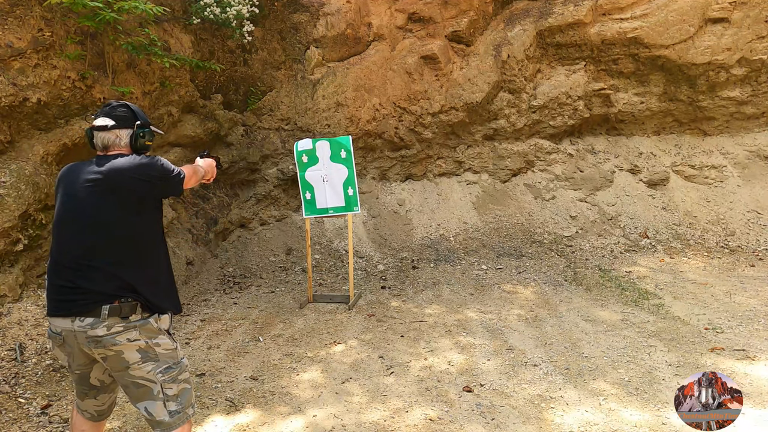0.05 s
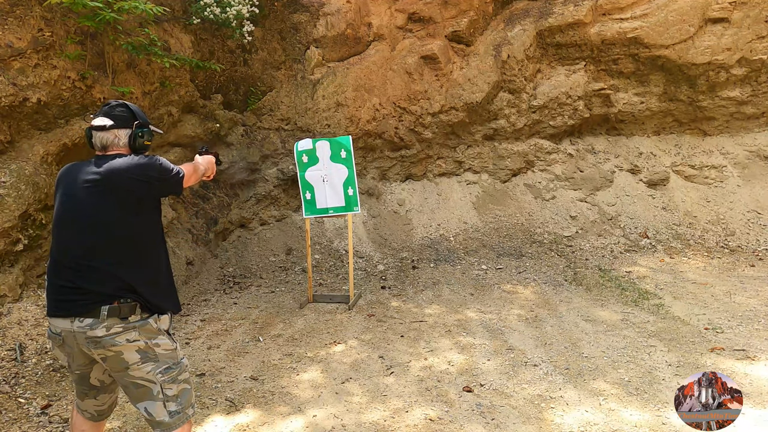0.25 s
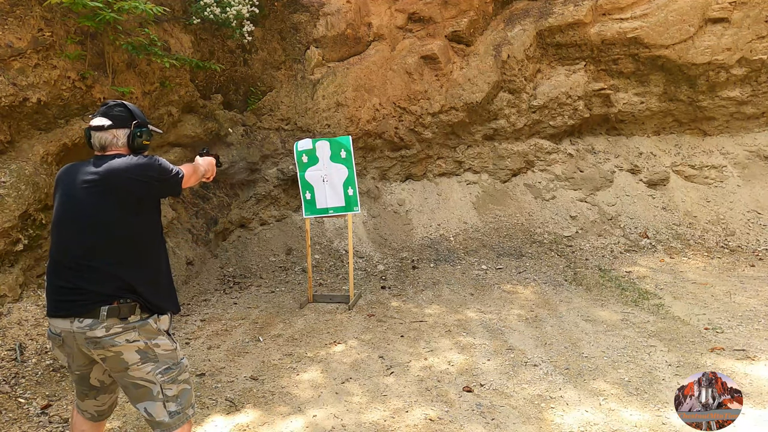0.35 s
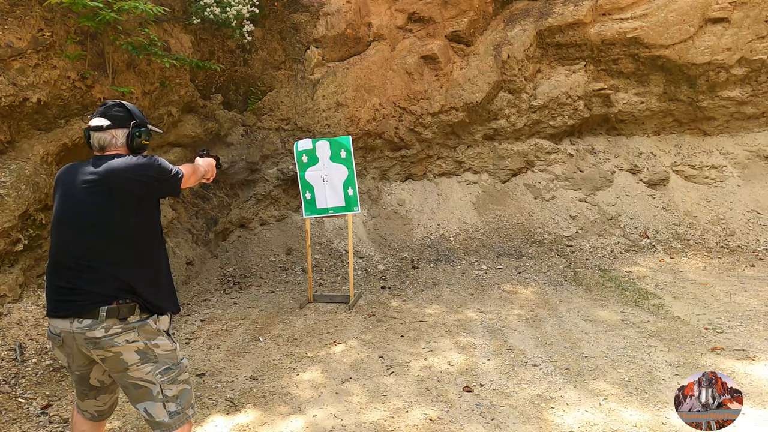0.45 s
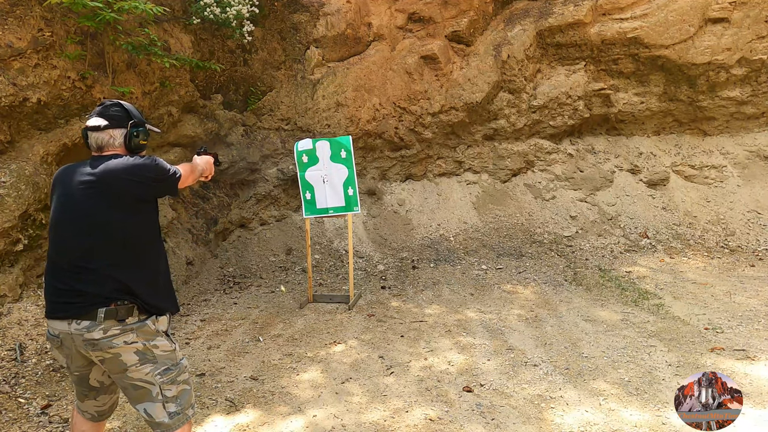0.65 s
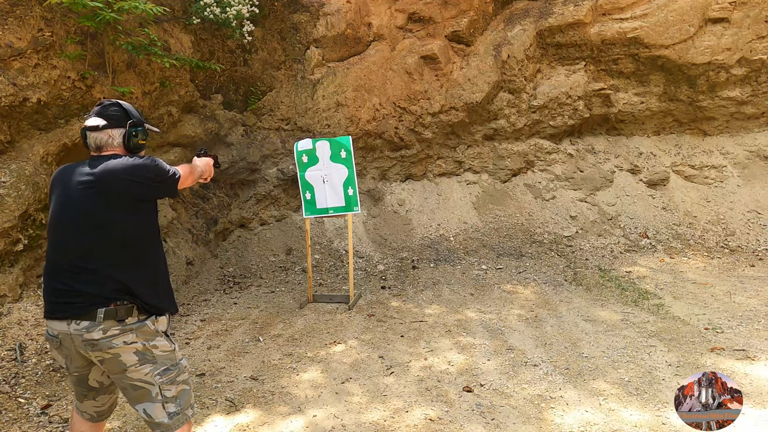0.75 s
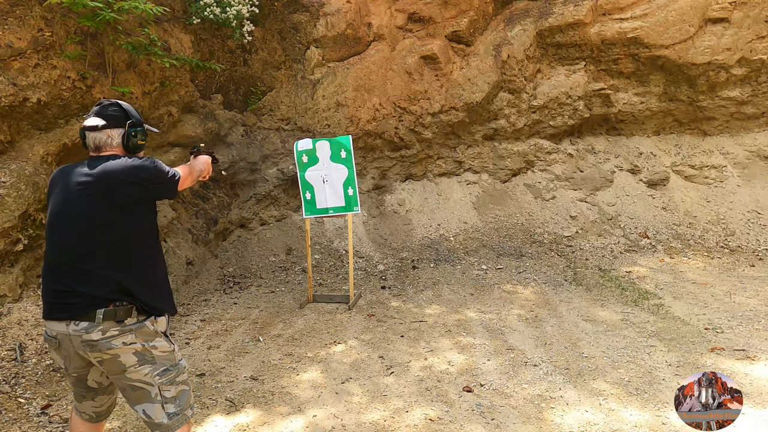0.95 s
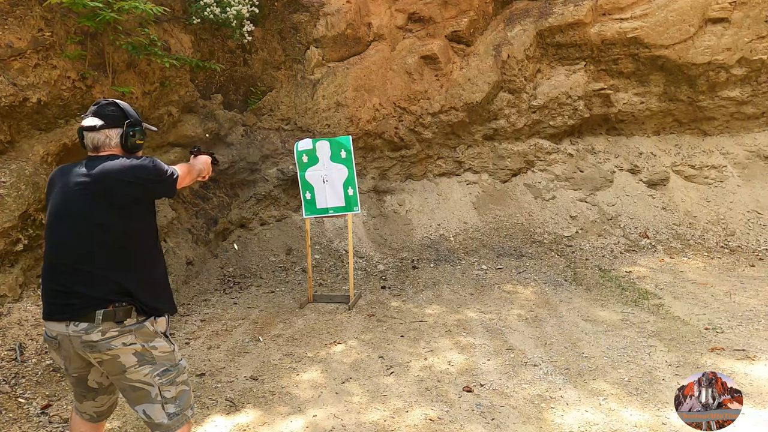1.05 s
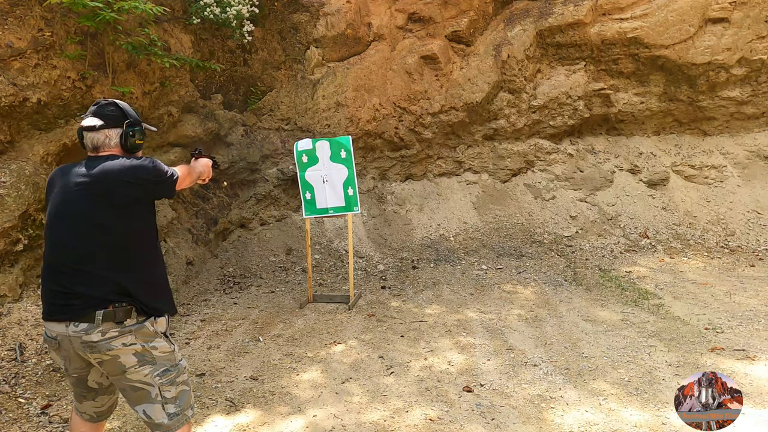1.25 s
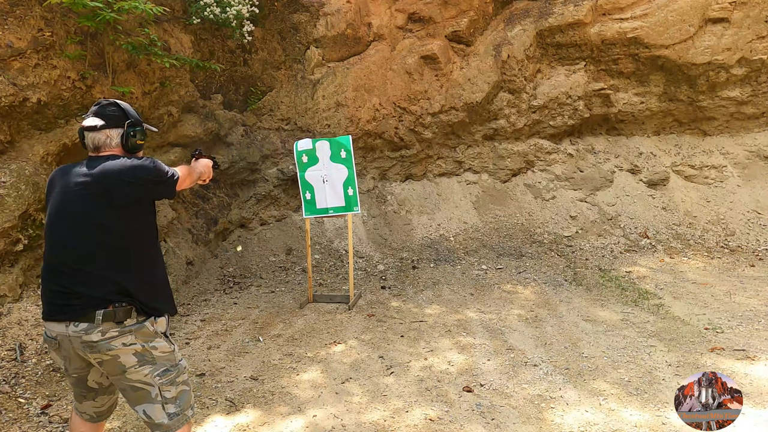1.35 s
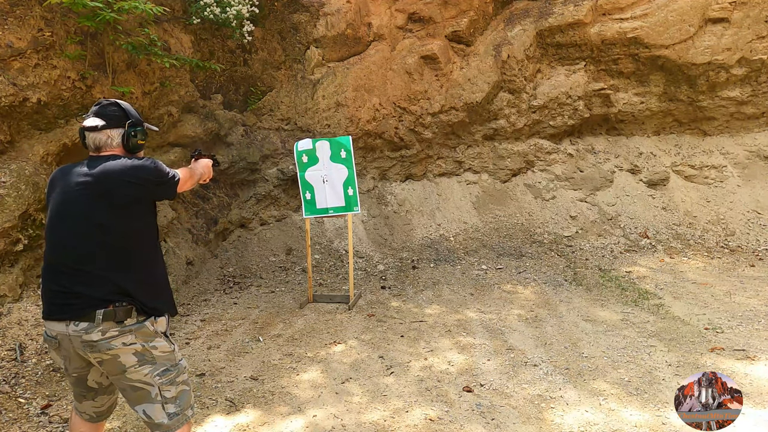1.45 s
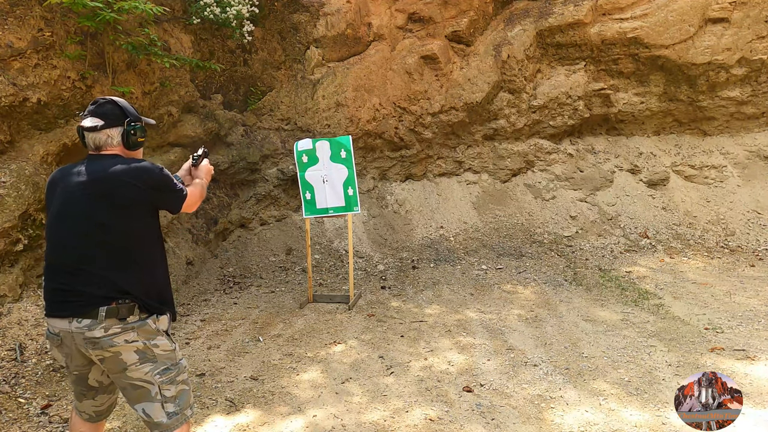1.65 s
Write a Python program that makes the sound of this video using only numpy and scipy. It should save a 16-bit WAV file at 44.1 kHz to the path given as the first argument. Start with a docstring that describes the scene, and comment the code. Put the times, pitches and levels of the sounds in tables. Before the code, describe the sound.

Three sharp pistol shots, about 0.4 seconds apart, overload a nearby microphone in a sandy pit; each slaps off ground and bank, then leaves a diffuse echo tail over the faint roar of earlier gunfire.

```python
"""Sandy pit by woods: three quick pistol shots, a few metres from a camera microphone that overloads on each crack.
A pressure jump, two ringing bands and a burst of gas make each crack; shaped noise and dull pulses answer it:
slaps off the ground and nearby things, a boom off the earth bank, then a long wash from the woods.
A hollow chord with a buzz swells just ahead of each crack, longest and with a rattle before the first.
Earlier gunfire hangs in the air as a fading roar of coloured noise."""
import sys
import numpy as np
from scipy import signal
from scipy.fft import rfft, irfft
from scipy.io import wavfile
from scipy.ndimage import uniform_filter1d

SR = 44100
rng = np.random.default_rng(int(sys.argv[2]) if len(sys.argv) > 2 else 0)


def bounce(signal):
    """Save signal as a 16-bit WAV file at the path given by the first command-line argument."""
    frames = np.transpose(np.atleast_2d(signal))
    limited = np.clip(frames, -1, 1)
    pcm = np.round(limited * 32767).astype(np.int16)
    wavfile.write(sys.argv[1], SR, pcm)


N = 74970
T = np.arange(N) / SR
HZ = np.fft.rfftfreq(N, 1 / SR)

# Every colour table is a spectrum drawn through points: f/Hz, level/dB

# Roar of earlier gunfire in the air: colour
AIR_COLOUR = [(30, -14), (70, -8.5), (150, 1.5), (320, 1.5), (580, -2), (1000, -9.5), (3000, -13),
              (4500, -19.5), (7200, -30.5), (9300, -49), (11600, -39), (15000, -68)]
AIR_START_DB, AIR_FADE_DB_PER_S = -38, 8
# Faint stereo hiss: colour
SIDE_COLOUR = [(30, -8), (400, -24), (2000, -17), (9200, -4), (11800, 6.5), (14000, -17)]
SIDE_DB = -62.5

# Clicks of the rattle ahead of the first shot: t/s, level/dB
RATTLE = [(0.2278, -15.5), (.2383, -14), (0.2488, -7.5), (.2600, -7)]
# One click: colour
RATTLE_COLOUR = [(100, -12), (600, -1), (3800, -1.5), (4700, -16), (5400, -13), (9000, -28), (15000, -35)]
RATTLE_DECAY_S, REBOUND_DELAY_S, REBOUND_DB = 0.0016, 0.0044, -3

# Swell ahead of each crack: end t/s, chord level/dB, length/s, extra level of low tones/dB, buzz level/dB
SWELLS = [(0.2695, -9.5, .028, 0.5, -17), (0.6893, -14, .011, -5, -25), (1.0758, -14.5, 0.012, -7, -28)]
# Tones of the chord: f/Hz, level/dB within the chord
TONES = [(328, 0.5), (430, -13), (517, -3), (700, -8.5), (894, 1.5), (1160, -11.5), (1545, -14),
         (1830, -12.5)]
# Buzz: colour
BUZZ_COLOUR = [(100, -4), (400, 6), (1000, 1.5), (2200, -8), (4600, -1.5), (5200, -23.5), (9000, -21.5),
               (10000, -35)]
LOW_TONES_HZ, BUZZ_TOP_HZ, BUZZ_PERIOD_S = 600, 9600, 0.0108
SWELL_STEEPNESS, SWELL_STOP_S = 3.7, 0.0024

# Shots: t/s, crack gain/dB, near echo gain/dB, far wash gain/dB, far rumble gain/dB,
# climb of the wash to its crest/dB, fade of the wash after its crest/dB per s (negative grows)
SHOTS = [(0.2702, -1.5, 0, -4.5, 2.5, 5.5, -18), (0.6897, -.5, 0, 0.7, -3.5, 14, 40),
         (1.0752, -1, 1.5, 1, -2.5, 10.5, 40.5)]
# Ringing bands of each crack: low f/Hz, low level/dB, middle f/Hz, middle level/dB
CRACK_BANDS = [(780, -2.5, 1600, 0), (1020, -2.5, 1900, -1), (870, 3.5, 1470, -6)]
# Burst of gas: colour
GAS_COLOUR = [(40, -12.5), (500, -1), (2400, 1), (3100, -7.5), (3900, 2.5), (4600, -6.5), (7000, -14.5),
              (9000, -32), (12000, -23), (16000, -27)]
BLAST_S, BLAST_DB = 0.00046, -5.5
GAS_DB, GAS_HOLD_S, GAS_FALL_S = -4, 0.0018, 0.00035
LOW_AT_S, MIDDLE_AT_S, BAND_HALF_LENGTH_S = 0.0008, 0.001316, 0.00077

# Slaps off the ground and nearby things: delay/s, level/dB, decay/s
SLAPS = [(.0036, -11, .0015), (.0075, -22, .003), (0.0112, -7.5, .0014), (0.0133, -6, .0012)]
# Slaps: colour
SLAP_COLOUR = [(50, -39), (600, 2), (1300, -7), (2900, 2), (4200, -12.5), (7000, -22.5), (9200, -47),
               (11800, -36), (15000, -60)]
SNAP_RISE_S = 0.00048
# Low echoes off the ground and the ledges of the bank: delay/s, level/dB, centre f/Hz, half length/s
KNOCKS = [(.006, -10.5, 240, .0036), (.015, -12, 480, .0023), (0.0295, -11.5, 554, .0024),
          (0.0395, -12, 1096, 0.0023), (.0473, -13, 290, .005), (.0675, -15.5, 194.7, .0065)]
# Spray off the rough foot of the bank, a single row: crest delay/s, level/dB, rise/s, decay/s
FOOT = (0.02, -19.5, 0.6, 0.0467)
# Spray: colour
FOOT_COLOUR = [(40, -28), (140, 3.5), (700, 2.5), (3000, -5.5), (4500, -9.5), (7000, -20), (9200, -38.5),
               (11800, -24), (14500, -55)]
# Boom off the face of the bank: colour
BOOM_COLOUR = [(40, -29), (120, -9.5), (220, -2.5), (320, 4), (420, -3.5), (620, 2), (880, -9),
               (1200, -2.5), (1800, -18.5), (5000, -26), (15000, -87)]
BOOM_AT_S, BOOM_DB, BOOM_RISE_S, BOOM_DECAY_S = 0.0432, -10.5, 0.01, 0.014

# Wash from the woods: colour ahead of the treble loss
WASH_COLOUR = [(60, -55), (200, -14), (550, 1), (1100, -.5), (1600, -5), (2500, -2.04), (4000, -5.5),
               (5500, -11.5), (7500, -20.5), (8700, -29), (9200, -37), (10200, -31), (11900, -27),
               (13000, -41), (14200, -68)]
TREBLE_LOSS_DB_PER_S_KHZ = 5
WASH_DB, WASH_BEND_S, WASH_CREST_S, WASH_ONSET_DB = -24, 0.11, 0.18, -20
WASH_END_S, WASH_END_DB_PER_S = 0.35, 23.5  # from here on every wash dies at the same rate
# Far rumble: colour
RUMBLE_COLOUR = [(25, -62), (60, -39), (120, -13), (280, 0.5), (430, -3), (630, -8), (1100, -12.5),
                 (5000, -48), (15000, -110)]
RUMBLE_AT_S, RUMBLE_DB, RUMBLE_RISE_S, RUMBLE_DECAY_S = 0.17, -31.5, 0.094, 0.31
# Dull separate returns off the hillsides: delay/s, level/dB, centre f/Hz, half length/s
RETURNS = [(.145, -27.5, 305, 0.018), (.2, -29, 280, .006), (.297, -28, 414, .011),
           (.368, -31.5, 580, .012), (.5, -41, 150, .012), (.555, -33.5, 655, 0.011)]

# Faint high tick after the last shot: t/s, level/dB
TICKS = [(1.482, -50.5)]
# Tick: colour
TICK_COLOUR = [(8500, -25), (10500, 4), (12500, -3), (15000, -16)]
TICK_DECAY_S = 0.0036

# Microphone response: f/Hz, level/dB
MIC = [(20, -18), (50, -9), (110, 0), (12000, 0), (14000, -9), (16000, -16)]
CLIP_TOP, CLIP_HARDNESS, TOP_HZ = 0.95, 4.4, 16400


def amp(db):
    """Decibels to gain."""
    return 10 ** (np.asarray(db) / 20)


def unit(x):
    """Scale to rms 1."""
    return x / np.sqrt(np.mean(x ** 2) + 1e-20)


def colour(points):
    """Gain at every frequency, from (Hz, dB) points on a log axis."""
    f, db = np.transpose(points)
    return amp(np.interp(np.log(HZ + 1), np.log(f), db))


def noise(points):
    """Steady coloured noise of rms 1."""
    return unit(irfft(rfft(rng.standard_normal(N)) * colour(points), N))


def crest(at, db, rise, decay):
    """An envelope that rises smoothly to a crest and dies away."""
    before, after = np.minimum(T - at, 0), np.maximum(T - at, 0)
    return amp(db) * np.exp(-(before / rise) ** 2 - after / decay)


def snap(at, db, decay):
    """An envelope with a very quick attack."""
    t = np.maximum(T - at, 0)
    return amp(db) * (1 - np.exp(-(t / SNAP_RISE_S) ** 2)) * np.exp(-t / decay)


def scatter(envelope, points, count=3):
    """A dense noise burst, pulled in turn towards its colour and its outline in time."""
    gain = colour(points)
    x = noise(points) * envelope
    outline = np.abs(uniform_filter1d(envelope ** 2, size=110))
    for _ in range(count):
        # even out the spectrum around the wanted colour
        z = rfft(x)
        power = np.abs(uniform_filter1d(np.abs(z / gain) ** 2, size=120))
        x = unit(irfft(z / np.sqrt(power + 1e-12), N))
        # restore the outline in time
        local_power = np.abs(uniform_filter1d(x ** 2, size=110))
        x = x * np.sqrt(outline / (local_power + 1e-4))
    return x * np.sqrt(np.sum(envelope ** 2) / np.sum(x ** 2))


def delayed(x, s):
    """x, starting s seconds later."""
    return np.pad(x, (max(round(s * SR), 0), 0))[:N]


def knock(at, db, hz, half_length):
    """A short rounded pulse, a cosine under a bell, with its weight around one frequency."""
    t = T - at
    return -amp(db) * np.cos(2 * np.pi * hz * t) * np.exp(-(t / half_length) ** 2)


def air_roar():
    """Earlier gunfire still hanging in the air: coloured noise that fades steadily."""
    return amp(AIR_START_DB - AIR_FADE_DB_PER_S * T) * noise(AIR_COLOUR)


def side_hiss(mid):
    """A faint wide hiss whose level follows the loudness of the centre."""
    loudness = unit(np.sqrt(np.abs(uniform_filter1d(mid ** 2, size=900))))
    return amp(SIDE_DB) * loudness * noise(SIDE_COLOUR)


def rattle():
    """One short noise click and its rebound, repeated at nearly even spacing into the first shot."""
    click = scatter(snap(0, 0, RATTLE_DECAY_S), RATTLE_COLOUR)
    pair = click + amp(REBOUND_DB) * delayed(click, REBOUND_DELAY_S)
    return sum(amp(db) * delayed(pair, s) for s, db in RATTLE)


def swells():
    """A hollow chord of sines and a buzz of repeated noise grow ahead of each crack and stop as it hits."""
    out = np.zeros(N)
    for end, db, length, low_db, buzz_db in SWELLS:
        ahead = np.maximum(end - T, 0)
        envelope = np.exp(-(ahead / length) ** SWELL_STEEPNESS) * np.minimum(ahead / SWELL_STOP_S, 1)
        chord = np.zeros(N)
        for hz, level in TONES:
            tone = np.sin(2 * np.pi * (hz * T + rng.random()))
            chord += amp(level + low_db * (hz < LOW_TONES_HZ)) * tone
        # a short piece of noise on repeat buzzes at its repetition rate
        period = noise(BUZZ_COLOUR)[:round(BUZZ_PERIOD_S * SR)]
        buzz = unit(np.resize(period, N))
        buzz = unit(irfft(rfft(buzz) * (HZ < BUZZ_TOP_HZ), N))
        out += envelope * (amp(db) * chord + amp(buzz_db) * buzz)
    return out


def crack(low_hz, low_db, middle_hz, middle_db):
    """The muzzle blast: a pressure jump and its suction, two briefly ringing bands and turbulent gas."""
    u = T / BLAST_S
    pressure = (1 - u) * np.exp(-u)
    blast = signal.lfilter(*signal.butter(2, 5000, fs=SR), pressure)
    low = knock(LOW_AT_S, low_db, low_hz, BAND_HALF_LENGTH_S)
    middle = knock(MIDDLE_AT_S, middle_db, middle_hz, BAND_HALF_LENGTH_S)
    gas_envelope = amp(GAS_DB) * np.exp(-np.maximum(T - GAS_HOLD_S, 0) / GAS_FALL_S)
    return amp(BLAST_DB) * blast + low + middle + scatter(gas_envelope, GAS_COLOUR)


def pit():
    """The near answer: sharp slaps, dull knocks, a spray off the foot of the bank, a boom off its face."""
    slaps = scatter(sum(snap(*row) for row in SLAPS), SLAP_COLOUR)
    knocks = sum(knock(*row) for row in KNOCKS)
    spray = scatter(crest(*FOOT), FOOT_COLOUR)
    boom = scatter(crest(BOOM_AT_S, BOOM_DB, BOOM_RISE_S, BOOM_DECAY_S), BOOM_COLOUR)
    return slaps + knocks + spray + boom


def woods():
    """Countless small echoes as noise; the later they come, the more treble the air has taken."""
    hz, t, z = signal.stft(noise(WASH_COLOUR), SR, nperseg=256)
    # the colour is as drawn at 0.2 s, brighter before and duller after
    loss_db = TREBLE_LOSS_DB_PER_S_KHZ * np.outer(hz / 10 ** 3, t - .2)
    return signal.istft(z * amp(-loss_db), SR, nperseg=256)[1][:N]


def wash_level_db(climb_db, fade):
    """The wash starts low, climbs to its crest, then follows its own fade and at last the common one."""
    level_db = np.interp(T, [0, WASH_BEND_S, WASH_CREST_S], [WASH_ONSET_DB, -climb_db, 0])
    level_db = level_db - fade * (np.clip(T, WASH_CREST_S, WASH_END_S) - WASH_CREST_S)
    return level_db - WASH_END_DB_PER_S * np.maximum(T - WASH_END_S, 0)


def shots():
    """Gun and camera stay put, so every shot meets the same echoes, at its own levels."""
    near, wash = pit(), woods()
    rumble = scatter(crest(RUMBLE_AT_S, RUMBLE_DB, RUMBLE_RISE_S, RUMBLE_DECAY_S), RUMBLE_COLOUR)
    hillsides = sum(knock(*row) for row in RETURNS)
    out = np.zeros(N)
    for shot, bands in zip(SHOTS, CRACK_BANDS):
        s, crack_db, near_db, wash_db, rumble_db, climb_db, fade = shot
        far = amp(WASH_DB + wash_db + wash_level_db(climb_db, fade)) * wash
        far = far + amp(rumble_db) * rumble + hillsides
        out += delayed(amp(crack_db) * crack(*bands) + amp(near_db) * near + far, s)
    return out


def ticks():
    """A thin tick after the last shot: high noise with a quick attack and a short decay."""
    return sum(snap(s, db, TICK_DECAY_S) for s, db in TICKS) * noise(TICK_COLOUR)


def scene():
    """Everything sits in the centre, over the fading roar in the air; only a faint hiss has width."""
    mid = air_roar() + rattle() + swells() + shots() + ticks()
    side = side_hiss(mid)
    return np.array([mid + side, mid - side])


def record(dry):
    """The microphone flattens peaks, thins both ends of the spectrum and keeps nothing above its band limit."""
    clipped = dry / (1 + np.abs(dry / CLIP_TOP) ** CLIP_HARDNESS) ** (1 / CLIP_HARDNESS)
    return irfft(rfft(clipped) * colour(MIC) * (HZ < TOP_HZ), N)


dry = scene()
out = record(dry)
bounce(out)
```